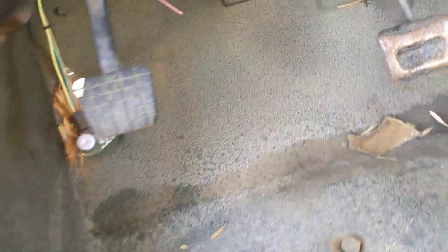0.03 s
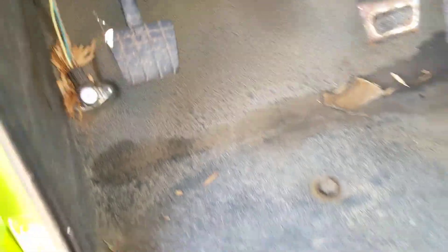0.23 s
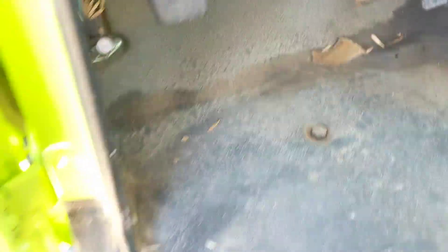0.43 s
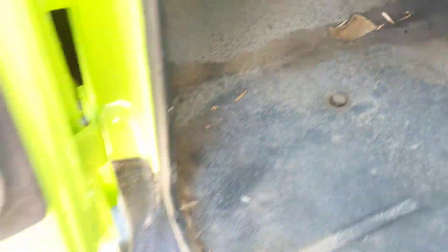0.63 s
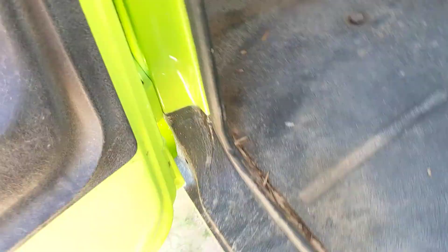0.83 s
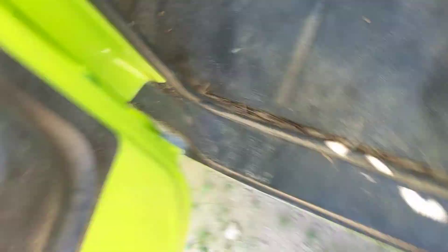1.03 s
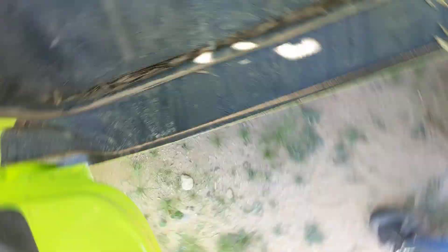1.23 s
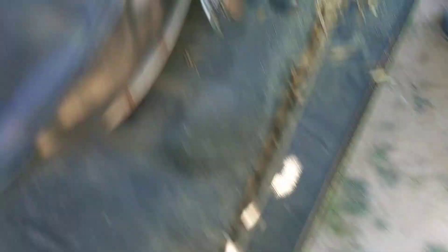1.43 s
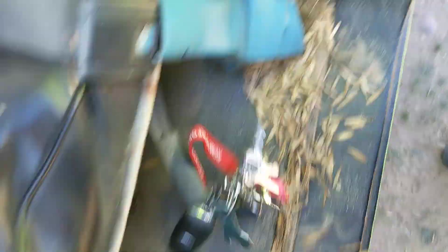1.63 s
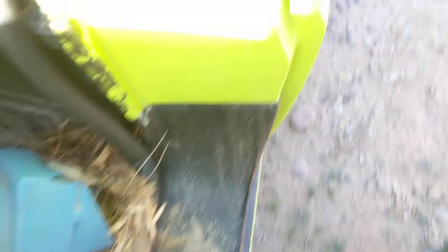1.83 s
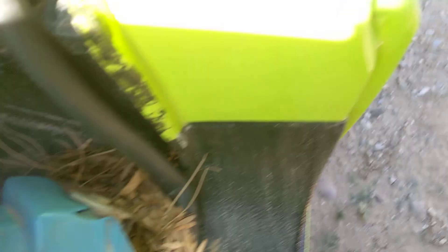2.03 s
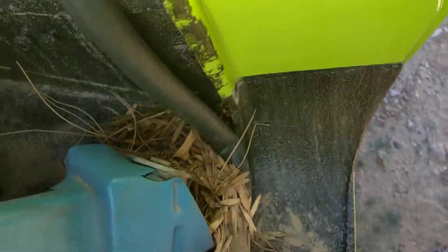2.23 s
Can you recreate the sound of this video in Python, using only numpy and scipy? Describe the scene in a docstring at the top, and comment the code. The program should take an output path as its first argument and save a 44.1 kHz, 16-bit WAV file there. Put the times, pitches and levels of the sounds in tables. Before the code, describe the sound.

Keys clink and jingle in uneven bursts as someone bumps around an open cab.

```python
"""A bunch of keys jangles as someone leans through the open cab of an old utility vehicle.
Single keys strike each other and ring, bright and thin, over a patter of tiny damped contacts.
Loose parts knock on the panels; the body scuffs over floor and seat with soft, low bumps.
A low drone and a faint hiss of outdoor air lie underneath."""
import sys
import numpy as np
from scipy import signal
from scipy.fft import rfft, irfft, next_fast_len
from scipy.io import wavfile
from scipy.ndimage import uniform_filter1d

SR = 44100
rng = np.random.default_rng(int(sys.argv[2]) if len(sys.argv) > 2 else 0)


def store_wav(level_fs):
    """Save 16-bit WAV to argv[1]."""
    pcm = np.round(np.clip(np.atleast_2d(level_fs), -1, 1) * 32767)
    wavfile.write(sys.argv[1], SR, pcm.T.astype(np.int16))


N = 101429

# How each metal piece in the bunch rings. piece: t60_s, modes of (pitch_hz, level_db)
KEY_VOICES = { "small key": (.055, [(15466, 0), (15600, -8), (14290, -8), (11536, -12), (10110, -15),
              (7880, -19)]), "thin key": (.2, [(14375, 0), (14470, -13), (12764, -12), (13227, -16),
              (8463, -20), (3284, -25)]), "long key": (.2, [(12950, 0), (10384, -7), (8890, -9),
              (12200, -11), (7850, -13), (6520, -18)]), "flat key": (.11, [(14003, 0), (5375, -14),
              (12910, -12), (7865, -19)]), "short key": (.11, [(11800, 0), (9857, -12), (15402, -14)]),
              "large ring": (.3, [(8296, 0), (10384, -3), (12188, -2), (13238, -6)]),
              "small ring": (.13, [(8457, 0), (14800, -6), (12695, -7)]), "held key": (.03, [(14400, -3),
              (15300, -5), (13700, -6), (12200, -9)]), "clip": (0.048, [(7560, 0.5), (12680, -13)]), }
# Clinks that stand out of the jangle: start_s, level_db, piece
CLINK_CUES = [(0.097, -18.5, "held key"), (.227, -15, "small key"), (0.264, -6, "small key"),
              (.276, -7.5, "small key"), (0.35, -17.5, "held key"), (0.393, -31.5, "short key"),
              (.515, -26, "held key"), (0.763, -19, "flat key"), (0.776, -14, "thin key"),
              (.794, -23, "long key"), (0.812, -10.5, "flat key"), (0.825, -28.5, "large ring"),
              (0.867, -26, "large ring"), (0.922, -22, "flat key"), (0.949, -9, "thin key"),
              (0.974, -10, "thin key"), (1.092, -23, "thin key"), (1.229, -20.5, "thin key"),
              (1.265, -19, "held key"), (1.371, -30.5, "small ring"), (1.455, -10, "held key"),
              (1.484, -26, "small ring"), (1.58, -13.5, "long key"), (1.595, -17, "flat key"),
              (1.615, -15.5, "long key"), (1.673, -6.5, "flat key"), (1.705, -14.5, "long key"),
              (1.832, -18, "thin key"), (1.869, -11, "short key"), (2.225, -22, "clip")]
# How hard the bunch is shaken: time_s, level_db
SHAKE_LEVELS = [(.02, -37), (.08, -62), (.14, -34.5), (.19, -31), (.205, -16.5), (.28, -31), (.33, -41),
                (.355, -38.5), (.42, -47.5), (.56, -43.5), (.70, -36.5), (.73, -23), (.80, -23.5),
                (.87, -34.5), (.935, -28), (1.07, -28.5), (1.15, -43), (1.27, -31), (1.34, -39),
                (1.44, -36), (1.458, -25), (1.52, -41.5), (1.54, -16.5), (1.62, -20.5), (1.66, -24),
                (1.80, -27), (1.87, -24.5), (1.93, -30), (1.98, -26), (2.06, -37.5), (2.115, -40),
                (2.138, -26), (2.16, -50), (2.21, -44.5), (2.3, -32)]
# How much of the shake reaches the free-swinging keys: time_s, level_db
SWING_LEVELS = [(.7, -20), (.76, 1), (1.1, -14), (1.5, -1), (1.58, -5), (1.9, -5), (2.1, -6)]
# Bright tone of metal touching metal: frequency_hz, level_db
KEY_EQ = [(1500, -21), (3400, -9), (4500, -14), (5500, -4), (6900, -9), (8500, -5), (10900, -9), (12800, 1),
          (15500, 1)]
# Loose parts hitting the cab: start_s, level_db, centre_hz, t60_s
KNOCK_CUES = [(0.134, -20.5, 2980, 0.036), (.204, -25, 1870, 0.051), (0.263, -29, 425, 0.033),
              (0.592, -31, 2140, 0.048), (0.628, -32.5, 3930, 0.028), (.679, -33, 1530, 0.035),
              (0.718, -16.5, 1900, 0.03), (0.7232, -28, 2100, 0.028), (.73, -26, 2200, 0.11),
              (0.7619, -20.5, 870, 0.0091), (.889, -32.5, 273, 0.029), (.811, -24, 180, 0.02),
              (1.317, -30.5, 3980, 0.02), (1.5311, -13.5, 4200, 0.022), (1.541, -14.5, 3930, 0.072),
              (1.559, -24, 1380, 0.13), (1.705, -12, 1240, 0.059), (1.954, -11, 3300, 0.059),
              (1.957, -17.5, 1130, 0.2)]
# Tone of a clack, before the tilt around its centre: frequency_hz, level_db
KNOCK_EQ = [(200, 1.5), (620, -6.5), (950, -1.5), (1450, 3), (2200, -0.5), (3400, 2), (4600, -0.5),
            (6500, -4), (15000, 0.5)]
# Ringing modes of the cab panels: pitch_hz, level_db
PANEL_MODES = [(926, -1), (1395, -4.5), (1525, 4), (3240, -1), (3456, -2.5), (3824, -9.5)]
# Rubbing over the floor, then against the seat: time_s, level_db
FLOOR_LEVELS = [(.12, -59.5), (.23, -43), (.33, -59.5), (.56, -57), (.70, -44), (.73, -34.5), (.86, -39),
                (1.25, -38), (1.45, -72)]
SEAT_LEVELS = [(1.1, -59.5), (1.44, -42.5), (1.52, -41.5), (1.55, -22), (1.66, -37), (1.73, -28.5),
               (1.79, -35.5), (1.86, -27.5), (1.93, -33), (2.01, -33.5), (2.09, -48), (2.135, -43.5),
               (2.2, -51.5)]
# Raspy floor and duller seat: frequency_hz, level_db
FLOOR_EQ = [(300, -10), (700, -10.5), (1500, -2), (2500, 0), (3800, -18), (9000, -19)]
SEAT_EQ = [(400, -13.5), (650, -7.5), (950, 0.5), (1500, 2), (2100, -7.5), (3500, -4), (7000, -20)]
# Jostling of the body: time_s, level_db
BUMP_LEVELS = [(.55, -66.5), (.595, -44), (.64, -67), (.70, -49), (.725, -40.5), (.81, -39.5), (.86, -59),
               (.89, -50.5), (1.0, -49.5), (1.27, -46.5), (1.36, -59), (1.495, -49.5), (1.52, -33),
               (1.61, -34.5), (1.67, -40), (1.71, -44.5), (1.85, -52), (1.98, -37.5), (2.12, -55),
               (2.3, -57)]
# Muffled tone of the bumps: frequency_hz, level_db
BUMP_EQ = [(25, -10), (100, -17.5), (140, -10.5), (205, 0), (265, -1.5), (340, -12.5), (450, -7.5),
           (1500, -33)]
# The hum dying away: time_s, level_db
HUM_LEVELS = [(0, -45), (.15, -46.5), (.6, -44), (2.3, -59.5)]
# Outdoor air, rumble below and hiss above: frequency_hz, level_db
AIR_EQ = [(20, 12), (45, 8.5), (200, -4), (600, -19), (1550, -7), (2200, -8), (16000, -42)]

TICK_DB, TICK_T60_S, CLINK_RISE_S = -10.5, .058, .012
MODE_SCATTER_DB, MODE_PHASE_RAD = 1, 1.91  # the phase is the widest gap between the channels
CONTACTS_PER_S, CONTACT_SPREAD_DB, CONTACT_T60_S = 240, -1, .012
HELD_DB, HELD_T60_S = 3, .035
FREE_DB, STRIKES_PER_S, DETUNE_HZ = -2, 58, 20  # for each free key
KNOCK_TAIL_DB, KNOCK_TAIL_T60_S, KNOCK_DB_PER_OCTAVE = -12.5, .23, -8
PANEL_DB, PANEL_T60_S = -10.5, .13
SCUFFS_PER_S, SCUFF_SPREAD_DB, SCUFF_T60_S = 900, 1, .0088
THROB_HZ, THROB_DB, HUM_HZ, AIR_DB = 23.9, -36.5, 67.3, -51
HIGH_CUT_HZ = 15900
# Stereo image: pan is left minus right; likeness runs from 0 (wide) to 1 (mono)
KEYS_PAN_DB, KNOCK_PAN_DB, FLOOR_PAN_DB, SEAT_PAN_DB = 3, 4.5, 8.5, 2
KEYS_LIKE, KNOCK_LIKE, SCUFF_LIKE, BUMP_LIKE = .017, .11, .027, .92
HIT_SAMPLES = SR // 2


def key_clinks():
    """One piece strikes another: a sharp tick, then its ring blooms and dies away."""
    out = np.zeros((2, N))
    for start_s, level_db, piece in CLINK_CUES:
        tick = equalise(burst(KEYS_LIKE, TICK_T60_S), KEY_EQ)
        ringing = (1 - decay(CLINK_RISE_S)) * ring(*KEY_VOICES[piece])
        add(out, start_s, undb(level_db) * (ringing + undb(TICK_DB) * tick))
    return pan(out, KEYS_PAN_DB)


def held_contact():
    """Held keys touch: a click and a random cluster of high, quickly damped modes."""
    click = unit(burst(KEYS_LIKE, CONTACT_T60_S))
    modes = [(hz, 0) for hz in rng.uniform(3000, 16000, size=24)]
    return click + undb(HELD_DB) * unit(ring(HELD_T60_S, modes))


def key_jangle():
    """Held keys chatter with the shake, while keys that swing free are struck and ring on."""
    shake = envelope(SHAKE_LEVELS)
    out = equalise(patter(shake, CONTACTS_PER_S, CONTACT_SPREAD_DB, held_contact), KEY_EQ)
    swing = shake * envelope(SWING_LEVELS)
    for piece in ("long key", "flat key", "short key"):
        t60_s, modes = KEY_VOICES[piece]
        # Halving the decibels brings the weaker modes forward.
        strike = lambda: ring(t60_s, [(rng.normal(hz, DETUNE_HZ), db / 2) for hz, db in modes])
        out += undb(FREE_DB) * patter(swing, STRIKES_PER_S, CONTACT_SPREAD_DB, strike)
    return pan(out, KEYS_PAN_DB)


def panel_knocks():
    """Loose parts hit the panels: a hard clack, a brief ring and the short tail of the cab."""
    out = np.zeros((2, N))
    tail = undb(KNOCK_TAIL_DB) * decay(KNOCK_TAIL_T60_S)
    for start_s, level_db, centre_hz, t60_s in KNOCK_CUES:
        impact = noise(KNOCK_LIKE, HIT_SAMPLES) * (decay(t60_s) + tail)
        clack = equalise(impact, tilt(KNOCK_EQ, centre_hz))
        panel = undb(PANEL_DB) * ring(PANEL_T60_S, tilt(PANEL_MODES, centre_hz))
        add(out, start_s, undb(level_db) * (clack + panel))
    return pan(out, KNOCK_PAN_DB)


def scuffing(levels, eq, pan_db):
    """Dry rubbing on a surface: a dense stream of tiny noise grains."""
    grain = lambda: burst(SCUFF_LIKE, SCUFF_T60_S)
    rub = patter(envelope(levels), SCUFFS_PER_S, SCUFF_SPREAD_DB, grain)
    return pan(equalise(rub, eq), pan_db)


def body_bumps():
    """The body jostles in the cab: soft swells of low noise."""
    return equalise(noise(BUMP_LIKE, N) * envelope(BUMP_LEVELS), BUMP_EQ)


def background():
    """A deep, steady throb, a hum that fades away and outdoor air, all in the centre."""
    turn = 2 * np.pi * seconds()
    throb = undb(THROB_DB) * np.sin(THROB_HZ * turn)
    hum = envelope(HUM_LEVELS) * np.sin(HUM_HZ * turn)
    air = undb(AIR_DB) * equalise(noise(1, N), AIR_EQ)
    return throb + hum + air


def ring(t60_s, modes):
    """Struck metal: decaying sines, each scattered in level and in left and right phase."""
    t, out = seconds()[:HIT_SAMPLES], 0
    for hz, db in modes:
        scatter, lag, start = rng.standard_normal(3)
        phase = np.pi * start + MODE_PHASE_RAD * np.tanh(2 * lag) * np.array([[.5], [-.5]])
        out += undb(db + MODE_SCATTER_DB * scatter) * np.sin(2 * np.pi * hz * t + phase)
    return out * decay(t60_s)


def contacts(per_s, spread_db):
    """Random tiny impacts of uneven size, evened out in power over 40 ms."""
    sizes = undb(spread_db * np.minimum(rng.exponential(size=N), 4))
    polarity = rng.choice([-1, 1], N)
    hits = (rng.random(N) < per_s / SR) * sizes * polarity
    power = np.abs(uniform_filter1d(hits ** 2, SR // 25))
    return hits / np.sqrt(power + 1e-4)


def patter(gain, per_s, spread_db, make_hit):
    """Three streams of contacts share the rate, each triggering its own short sound."""
    out = 0
    for _ in range(3):
        hit = make_hit()
        hit = hit / np.sqrt(3 * np.sum(hit ** 2) / 2)  # a third of the power per stream
        triggers = gain * contacts(per_s / 3, spread_db)
        out += signal.fftconvolve(triggers[None], hit, axes=1)[:, :N]
    return out


def noise(likeness, samples):
    """Stereo white noise with a given likeness of the channels."""
    mid, side = rng.standard_normal((2, samples))
    mid, side = np.sqrt(1 + likeness) * mid, np.sqrt(1 - likeness) * side
    return np.array([mid + side, mid - side]) / np.sqrt(2)


def burst(likeness, t60_s):
    """Noise with an instant attack and a quick decay."""
    return noise(likeness, HIT_SAMPLES) * decay(t60_s)


def equalise(x, eq):
    """EQ through (frequency_hz, level_db) points, scaled to unit power gain."""
    size = 2 * next_fast_len(x.shape[1] // 2 + 2048)
    hz, db = np.array(eq).T
    octave = np.log2(np.maximum(np.fft.rfftfreq(size, 1 / SR), 1))
    gain = unit(undb(np.interp(octave, np.log2(hz), db)))
    # Minimum phase keeps attacks crisp: nothing rings ahead of a hit.
    cepstrum = irfft(np.log(gain))
    cepstrum[1:size // 2] *= 2
    cepstrum[size // 2 + 1:] = 0
    return irfft(rfft(x, size) * np.exp(rfft(cepstrum)))[:, :x.shape[1]]


def tilt(points, centre_hz):
    """Roll a knock's spectrum off on both sides of its centre."""
    return [(hz, db + KNOCK_DB_PER_OCTAVE * abs(np.log2(hz / centre_hz))) for hz, db in points]


def decay(t60_s):
    """Exponential decay, 60 dB down after t60_s."""
    return np.exp(-np.log(1000) * seconds()[:HIT_SAMPLES] / t60_s)


def envelope(levels):
    """Gain that rides through (time_s, level_db) points."""
    return undb(np.interp(seconds(), *np.array(levels).T))


def pan(x, db):
    """Lean a stereo sound to the left."""
    return x * undb(np.array([[db], [-db]]) / 2)


def add(out, start_s, x):
    """Mix x in at its cue."""
    i = int(start_s * SR)
    out[:, i:i + x.shape[1]] += x[:, :N - i]


def undb(db):
    """Decibels to gain."""
    return 10 ** (np.asarray(db) / 20)


def unit(x):
    """Scale to rms 1."""
    return x / np.sqrt(np.mean(x ** 2))


def seconds():
    """The time of every sample."""
    return np.arange(N) / SR


def scene():
    """Keys up front, knocks and body movement around them, the background underneath."""
    keys = key_clinks() + key_jangle()
    impacts = panel_knocks() + body_bumps()
    floor = scuffing(FLOOR_LEVELS, FLOOR_EQ, FLOOR_PAN_DB)
    seat = scuffing(SEAT_LEVELS, SEAT_EQ, SEAT_PAN_DB)
    return keys + impacts + floor + seat + background()


def record(dry):
    """Hard-limit the mix at full scale, then cut the very top with a steep low-pass."""
    high_cut = signal.ellip(10, .2, 70, HIGH_CUT_HZ, fs=SR, output="sos")
    return signal.sosfilt(high_cut, np.clip(dry, -1, 1))


dry = scene()
out = record(dry)
store_wav(out)
```